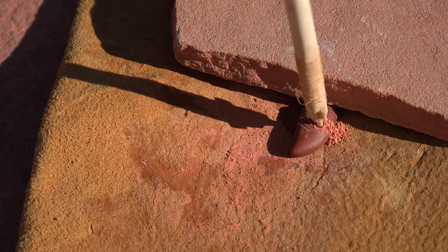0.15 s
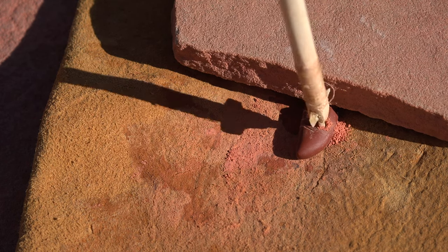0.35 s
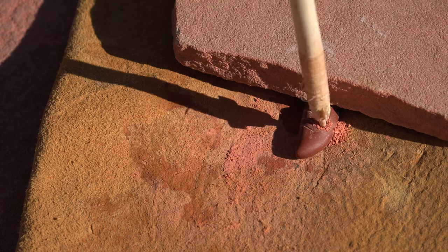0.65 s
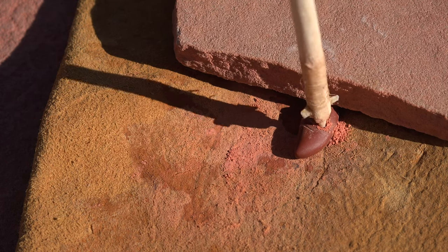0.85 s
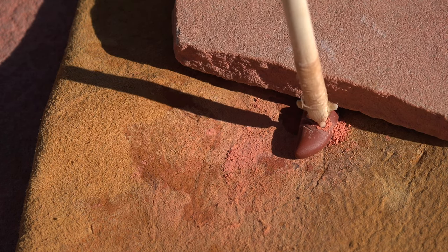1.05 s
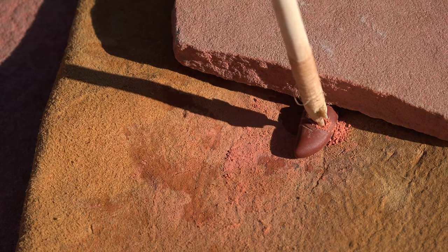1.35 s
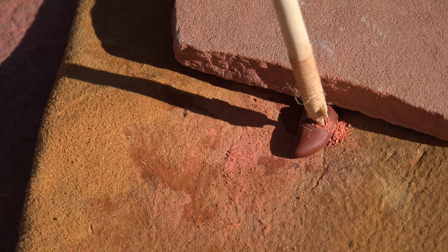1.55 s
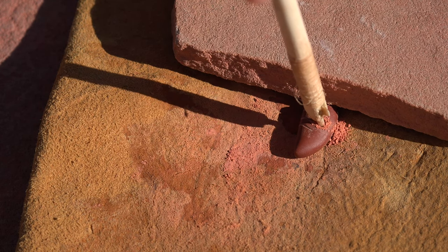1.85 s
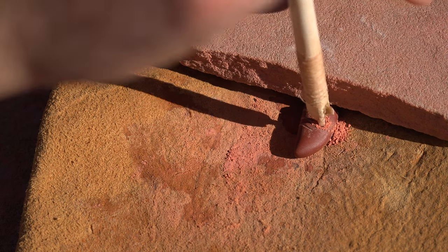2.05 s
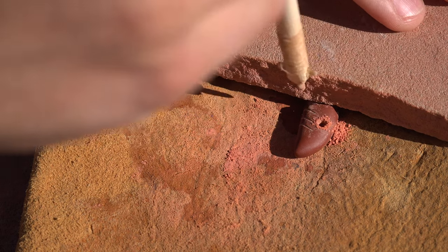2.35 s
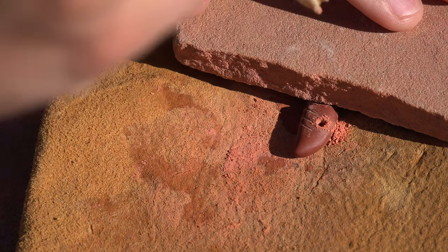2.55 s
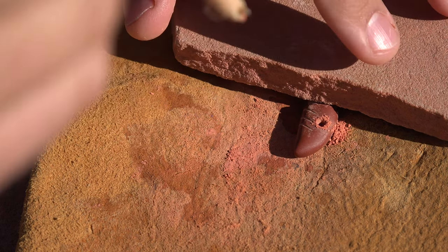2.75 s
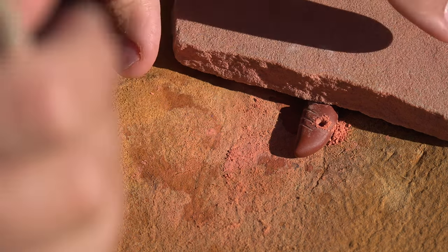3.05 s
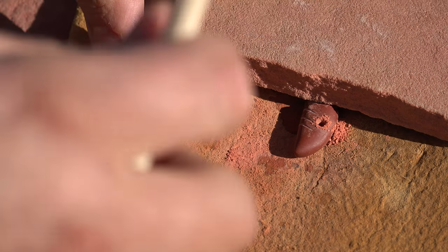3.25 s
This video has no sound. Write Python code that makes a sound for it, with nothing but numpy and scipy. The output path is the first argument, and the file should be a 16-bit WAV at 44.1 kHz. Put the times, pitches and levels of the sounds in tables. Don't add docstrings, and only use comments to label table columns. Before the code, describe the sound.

Close dry grinding with crunches and woody knocks for one second, quiet palm rubbing, a brief clicking rattle as the stick leaves its hole, then cloth brushing and finger rustle over low wind rumble outdoors.

```python
import sys
import numpy as np
from scipy import signal
from scipy.fft import rfft, irfft
from scipy.io import wavfile
from scipy.ndimage import uniform_filter1d

SR = 44100
rng = np.random.default_rng(int(sys.argv[2]) if len(sys.argv) > 2 else 0)


def convert_level_to_amplitude(level_db):
    exponent = np.asarray(level_db, float) / 20
    return 10 ** exponent


def file_out(sig):
    cols = np.atleast_2d(sig).T
    lim = np.clip(cols, -1, 1)
    pcm = np.round(lim * 32767).astype(np.int16)
    wavfile.write(sys.argv[1], SR, pcm)


N = 149940

# (start [s], length [s], level [dB], skew [power])
TURNS = [
    (-.03, 0.27, -38, 0.84),
    (0.218, 0.26, -37.5, 0.98),
    (0.453, 0.31, -36.5, 1.52),
    (0.743, 0.28, -39, 0.84),
]
# (centre [s], length [s], grit level [dB], shaft knock level [dB], knock pitch [Hz])
BITES = [(0.046, 0.023, -39, -31.5, 2650), (0.07, 0.027, -45, -39, 2530), (0.097, 0.015, -51, -32.5, 2440),
         (0.137, 0.029, -45, -31.5, 2330), (0.162, 0.028, -41.5, -36, 2140),
         (0.288, 0.023, -60, -28.5, 2320), (0.312, 0.02, -47, -32, 2490), (0.333, 0.015, -41, -41, 2720),
         (0.361, 0.038, -32.5, -44, 1400), (.386, 0.0082, -36, -64, 2000), (0.418, 0.032, -33, -48, 2120),
         (0.558, 0.027, -44, -35.5, 2330), (0.61, 0.017, -74, -43, 1830), (0.651, 0.03, -33, -29, 2620),
         (.674, 0.024, -44, -33.5, 2130), (0.721, 0.04, -40, -37, 1990), (0.73, 0.013, -38.5, -50, 2200),
         (0.546, .012, -44, -46, 3080), (0.833, 0.019, -53, -34, 2340), (0.861, 0.047, -35, -37, 2630),
         (0.901, 0.032, -32, -39, 1560), (0.926, 0.024, -47, -49, 1770)]
# (centre [s], length [s], level [dB], pitch [Hz])
CRUNCHES = [(0.086, 0.041, -36.5, 5650), (0.134, 0.022, -39, 7600), (0.288, 0.017, -36, 5170),
            (0.362, 0.026, -26.5, 4200), (0.367, 0.028, -32.5, 8400), (0.645, 0.024, -30, 6300),
            (0.721, 0.029, -34.5, 5960), (0.864, .03, -39, 7100), (0.892, 0.04, -35.5, 4100),
            (0.924, 0.027, -40, 4800), (0.097, .05, -36, 4700), (0.436, .03, -44, 5500)]
# (centre [s], length [s], level [dB], pitch [Hz])
BUMPS = [(0.323, 0.034, -46.5, 555.1), (.35, 0.11, -52.5, 890), (0.368, 0.055, -45.5, 326),
         (1.999, 0.018, -48.5, 1200), (2.0, .12, -52, 3889), (2.055, 0.024, -55, 4167),
         (2.103, 0.11, -39, 556), (2.1, 0.075, -41, 258), (.36, 0.057, -48.5, 187),
         (2.343, 0.027, -49.5, 3170), (2.361, .009, -48, 2590), (3.24, .04, -56, 4000)]
# (frequency [Hz], level [dB per Hz])
GRIT_COLOUR = [(530, -12), (1000, -7.5), (1380, -4), (2690, -2), (3260, -1), (4720, -0.5), (7600, -6.5),
               (10100, -10.5), (13000, -7.5), (16000, -11.5)]

# (time [s], level [dB])
LIFT = [
    (2.03, -55),
    (2.076, -52),
    (2.083, -36.5),
    (2.122, -37.5),
    (2.132, -40.5),
    (2.165, -42.5),
    (2.25, -66),
]
# (frequency [Hz], level [dB per Hz])
LIFT_COLOUR = [(130, -10), (270, -6), (760, -5.5), (2000, -13), (2600, -13), (2950, -7.5), (3720, -1.5),
               (5300, -0.5), (6000, -10.5), (10000, -18.5), (16000, -40)]
# (time [s], peak level [dB], ring pitch [Hz])
SNAGS = [(2.0822, -30, 3330), (2.0863, -27, 3600), (2.09, -26, 3420), (2.1017, -23, 3970),
         (2.106, -20, 3750), (2.1171, -16, 3310), (2.1195, -20, 3060), (2.126, -29, 3530),
         (2.135, -28, 3370), (2.148, -33, 3300), (2.156, -32, 3300), (2.163, -40, 3500),
         (2.3415, -40, 3100), (2.359, -41, 3000), (3.178, -40, 3800)]

# (start [s], length [s], level [dB], skew [power])
SLIDES = [
    (0.975, 0.78, -58, 0.24),
    (1.174, 0.53, -55, 3),
    (1.753, 0.54, -50, 0.54),
]
# (frequency [Hz], level [dB per Hz])
SKIN_COLOUR = [(1410, -38), (2400, -19), (2890, -12), (5320, -11), (5890, -9), (16000, -17.5)]
# (centre [s], length [s], level [dB])
GRIPS = [(1.748, 0.055, -50.5), (1.804, 0.02, -50), (1.626, .07, -63.5), (2.357, 0.046, -62),
         (3.047, 0.025, -61), (3.147, 0.24, -57), (3.18, 0.024, -56), (3.244, 0.098, -54),
         (3.301, 0.11, -56.5), (3.345, 0.14, -56)]
# (frequency [Hz], level [dB per Hz])
FINGER_COLOUR = [(1060, -34), (1800, -7), (4900, -6), (5660, -10.5), (16000, -15.5)]
# (frequency [Hz], width [Hz], level [dB])
SHAFT_MODES = [(2800, 300, -16), (4850, 160, -6), (5800, 200, -4), (6800, 180, -1), (8200, 180, 0),
               (9550, 200, -1), (10900, 200, 1), (12250, 200, 1), (13700, 240, -1), (15100, 240, -2)]
# (start [s], length [s], level [dB], skew [power])
BRUSHES = [
    (1.02, 0.32, -58, 1.5),
    (1.902, 0.53, -49.5, 0.74),
    (2.404, 0.69, -49.5, 1.2),
]
# (frequency [Hz], level [dB per Hz])
CLOTH_COLOUR = [(290, -52), (500, -4), (1930, -7), (2460, -5.5), (12000, -19.5), (16000, -23)]
# (centre [s], length [s], pitch [Hz], level
# [dB])
SQUEAKS = [(1.27, 0.32, 760, -57.5), (2.54, 0.54, 1280, -57.5), (3.09, 0.41, 1330, -61.5),
           (3.18, 0.044, 1340, -51), (3.22, 0.077, 1340, -47), (3.27, 0.1, 1330, -58),
           (3.13, 0.054, 5200, -65), (3.13, .06, 7600, -61.5), (3.14, .06, 11800, -59),
           (3.243, 0.079, 4860, -54.5), (3.28, .05, 4860, -61), (3.328, 0.048, 2680, -52),
           (3.335, 0.05, 4860, -55.5), (.59, 0.081, 2550, -46), (0.79, 0.075, 1940, -50),
           (.848, 0.046, 2620, -36), (.9, 0.021, 1640, -40), (0.274, 0.055, 2600, -49),
           (1.745, 0.032, 12200, -55), (1.748, .02, 8100, -54), (1.745, 0.023, 2100, -56),
           (1.4, .02, 2800, -55), (1.803, .016, 13700, -56), (1.828, .05, 11000, -57),
           (1.84, .03, 8300, -58), (1.93, 0.083, 9700, -56), (2.1, .12, 13000, -56),
           (2.346, .025, 3100, -46), (2.345, .015, 8900, -59), (2.352, .03, 6900, -64),
           (2.35, .03, 11600, -63), (3.047, .025, 13000, -59), (3.045, .025, 10200, -62),
           (3.045, .025, 9400, -62), (3.14, 0.055, 3200, -64), (3.182, .015, 4000, -57),
           (3.245, .06, 8100, -58), (3.29, 0.064, 6500, -57), (3.32, .07, 11600, -63),
           (3.35, .08, 8900, -61), (3.295, .03, 13200, -59)]

# (time [s], level [dB])
GUSTS = [(0.0, -26.5), (.45, -25), (.66, -33.5), (.78, -30.5), (1.0, -35), (1.2, -31), (1.33, -31),
         (1.5, -25), (1.66, -32.5), (1.78, -28.5), (2.0, -33), (2.1, -32), (2.27, -40.5), (2.6, -27),
         (2.73, -34), (2.96, -30.5), (3.11, -28.5), (3.4, -38)]
# (frequency [Hz], level [dB per Hz])
WIND_COLOUR = [(7.1, 14), (12, 1), (30, 1.5), (140, -30.5), (200, -43.5), (260, -42), (440, -120)]
# (frequency [Hz], level [dB per Hz])
HUM_COLOUR = [(59, -15), (100, 2), (497, -6), (1020, -7), (1290, -11.5), (1900, -19), (8000, -23.5),
              (16000, -28)]


def drill():
    push = grains(4000, 2.5)
    return crushed_grit(push) + shaft_knocks(push) + crunches(push) + bumps(push)


def crushed_grit(push):
    dust_hz, dust_db = 8300, 0
    residue_db = -57.5
    turn = sum(convert_level_to_amplitude(db) * stroke(s, length, skew) ** 1.57 for s, length, db, skew in TURNS)
    turn = turn + convert_level_to_amplitude(residue_db) * stroke(-0.24, 1.4, 1.5) ** 0.25
    bite = sum(convert_level_to_amplitude(db) * bite_shape(s, length) for s, length, db, _, _ in BITES)

    sand = grains(4000, 2.5)
    patches = np.zeros(N)
    for k, hz in enumerate(np.geomspace(1700, 9000, 16)):
        patches += (-1) ** k * convert_level_to_amplitude(3 * drift(70)) * resonate(sand, hz, hz / 11)

    low_pass = signal.butter(4, dust_hz, "low", fs=SR, output="sos")
    high_pass = signal.butter(4, dust_hz, "high", fs=SR, output="sos")
    grit = signal.sosfilt(low_pass, colour(0.89 * push + rms_one(patches), GRIT_COLOUR))
    grit = grit * convert_level_to_amplitude(2.7 * drift(180))
    dust = signal.sosfilt(high_pass, colour(rng.standard_normal(N), GRIT_COLOUR))
    dust = dust * convert_level_to_amplitude(dust_db + drift(58.6))
    return (turn + bite) * grit + (turn + convert_level_to_amplitude(-6.5) * bite) * dust


def bite_shape(centre, length):
    rise_share = 0.13
    u = (np.arange(N) / SR - centre) / length + 0.33
    u = np.where(u < 0, u / rise_share, u)
    return np.cos(np.pi / 2 * np.clip(u, -1, 1)) ** 2


def shaft_knocks(push):
    width_hz = 344
    out = np.zeros(N)
    for s, length, _, db, hz in BITES:
        a, b = int((s - 0.04) * SR), int((s + 0.04) * SR)
        ring = resonate(resonate(push[a:b], hz, 2.5 * width_hz), hz, width_hz)
        out[a:b] += convert_level_to_amplitude(db) * swell(s, 1.02 * length)[a:b] * rms_one(ring)
    return out


def crunches(push):
    out = np.zeros(N)
    for s, length, db, hz in CRUNCHES:
        burst = resonate(resonate(push, hz, hz / 2), hz, hz / 6)
        out += convert_level_to_amplitude(db) * swell(s, length) * rms_one(burst)
    return out


def bumps(push):
    out = np.zeros(N)
    for s, length, db, hz in BUMPS:
        thud = resonate(resonate(push, hz, 3 * hz), hz, 0.61 * hz)
        out += convert_level_to_amplitude(db) * swell(s, length) * rms_one(thud)
    return out


def lift():
    slips_per_s = 290
    slip_count = np.floor(np.cumsum(slips_per_s * convert_level_to_amplitude(3.0 * drift(200))) / SR)
    beats = np.diff(slip_count, prepend=0)
    jerks = beats * convert_level_to_amplitude(1.4 * rng.standard_normal(N)) * rng.choice([-1, 1], N)
    slips = rms_one(jerks) + 1.7 * grains(4600, 3.2)
    ring = rms_one(resonate(slips, 3000, 340) - resonate(slips, 5000, 870))
    body = colour(slips, LIFT_COLOUR) + 0.5 * ring
    scrape = curve(LIFT) * convert_level_to_amplitude(2.0 + 1.4 * drift(120)) * rms_one(body)
    return scrape + snags()


def snags():
    t60_s = 0.0098
    out = np.zeros(N)
    t = np.arange(SR // 20) / SR
    for s, db, hz in SNAGS:
        rattle = 0.5 * resonate(rng.standard_normal(len(t)), hz, hz)
        ring = np.sin(2 * np.pi * hz * t) + 0.69 * np.sin(2 * np.pi * 1.37 * hz * t) + rattle
        decay = convert_level_to_amplitude(db - 4 - 60 * t / t60_s) * np.minimum(t * 2500, 1)
        out[int(s * SR):int(s * SR) + len(t)] += decay * ring
    return out


def hands():
    shaft_slide_db, shaft_grip_db = 0, -4
    white = rng.standard_normal(N)
    shaft = np.zeros(N)
    for k, (hz, width_hz, db) in enumerate(SHAFT_MODES):
        shaft += (-1) ** k * convert_level_to_amplitude(db + 2.5 * drift(20)) * resonate(white, hz, width_hz)
    shaft = rms_one(shaft)

    slide = sum(convert_level_to_amplitude(db) * stroke(s, length, skew) ** 0.79 for s, length, db, skew in SLIDES)
    slide = slide * convert_level_to_amplitude(1.1 * drift(59.6) - 3.5)
    slide = slide * (colour(rng.standard_normal(N), SKIN_COLOUR) + convert_level_to_amplitude(shaft_slide_db) * shaft)
    grip = sum(convert_level_to_amplitude(db) * swell(s, length) for s, length, db in GRIPS)
    grip = grip * (colour(grains(6000, 2.5), FINGER_COLOUR) + convert_level_to_amplitude(shaft_grip_db) * shaft)
    return slide + grip + squeaks() + whistle(white)


def squeaks():
    width_share, evenness = 0.03, 0.45
    out, hiss = np.zeros(N), rng.standard_normal(N)
    for s, length, hz, db in SQUEAKS:
        a, b = int((s - length / 2 - 0.02) * SR), min(N, int((s + length / 2) * SR))
        width_hz = width_share * hz + 40
        tone = resonate(resonate(hiss[a:b], hz, width_hz), hz, width_hz)
        tone = tone / np.abs(signal.hilbert(tone)) ** evenness
        out[a:b] += convert_level_to_amplitude(db) * swell(s, length)[a:b] * rms_one(tone)
    return out


def whistle(white):
    start, end = 1.04, 1.26
    low_hz, high_hz, level_db = 5000, 6100, -57
    band = rms_one(uniform_filter1d(white, size=70))
    glide_hz = np.interp(np.arange(N) / SR, [start, (start + end) / 2, end],
                         [low_hz, high_hz * 0.97, high_hz])
    tone = np.sin(2 * np.pi * np.cumsum(glide_hz) / SR)
    return convert_level_to_amplitude(level_db) * stroke(start, end - start, 0.65) * band * tone


def sleeve():
    brush = sum(convert_level_to_amplitude(db) * stroke(s, length, skew) for s, length, db, skew in BRUSHES)
    return brush * colour(rng.standard_normal(N), CLOTH_COLOUR) * convert_level_to_amplitude(0.19 * drift(23.7))


def wind():
    rumble = colour(rng.standard_normal(N), WIND_COLOUR)
    rumble = rumble / (uniform_filter1d(rumble ** 2, size=SR // 8) ** 0.097 + 0.063)
    return curve(GUSTS) * rms_one(rumble)


def distant_hum():
    return convert_level_to_amplitude(-52 + 0.5 * drift(3.54)) * colour(rng.standard_normal(N), HUM_COLOUR)


def rms_one(x):
    return x / np.sqrt(np.mean(x ** 2) + 1e-20)


def curve(rows):
    s, db = np.transpose(rows)
    return convert_level_to_amplitude(np.interp(np.arange(N) / SR, s, db, left=-200, right=-200))


def swell(centre, length):
    return np.cos(np.pi * np.clip((np.arange(N) / SR - centre) / length, -.5, .5)) ** 2


def stroke(start, length, skew):
    return np.sin(np.pi * np.clip((np.arange(N) / SR - start) / length, 0, 1) ** skew)


def drift(rate):
    knots = rng.standard_normal(int(N / SR * 400) + 2)
    return np.interp(np.arange(N) / SR * rate, np.arange(len(knots)), knots)


def colour(x, spectrum):
    hz, db = np.transpose(spectrum)
    log_f = np.log(np.arange(N // 2 + 1) * SR / N + 1)
    gain = convert_level_to_amplitude(np.interp(log_f, np.log(hz), db, left=-90, right=-90))
    return rms_one(irfft(rfft(x) * gain, N))


def resonate(x, hz, width_hz):
    r = np.exp(-np.pi * width_hz / SR)
    feedback = [1, -2 * r * np.cos(2 * np.pi * hz / SR), r * r]
    return signal.lfilter([(1 - r * r) / 2, 0, (r * r - 1) / 2], feedback, x)


def grains(rate, spread_db):
    sizes = convert_level_to_amplitude(spread_db * np.minimum(rng.exponential(1, N), 4.5)) * rng.choice([-1, 1], N)
    clicks = rms_one(sizes * (rng.random(N) < rate / SR))
    return rms_one(clicks + 0.95 * rng.standard_normal(N))


def scene():
    return (drill() + lift() + hands() + sleeve() + wind() + distant_hum())[None]


def top_cut(x):
    return signal.sosfilt(signal.butter(12, 15780, fs=SR, output="sos"), x)


def record(dry):
    return top_cut(dry)


dry = scene()
out = record(dry)
file_out(out)
```